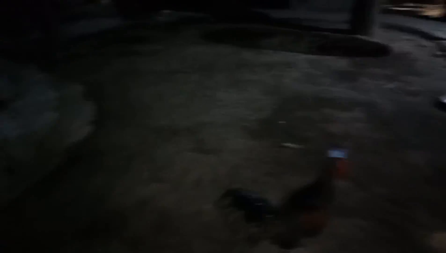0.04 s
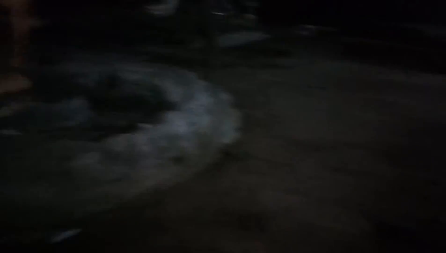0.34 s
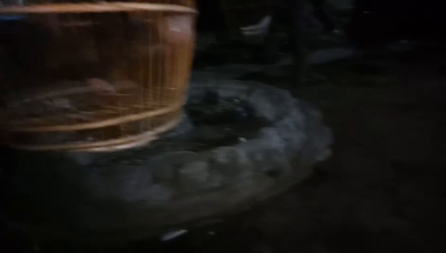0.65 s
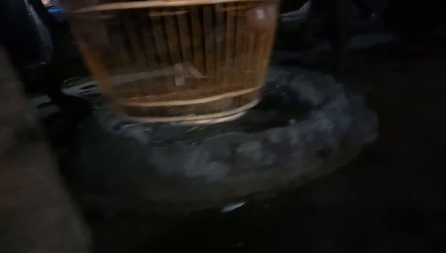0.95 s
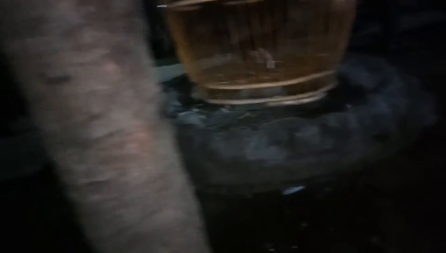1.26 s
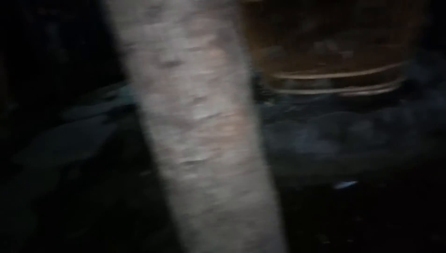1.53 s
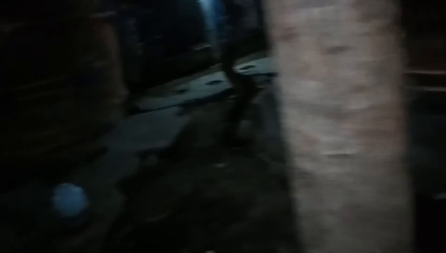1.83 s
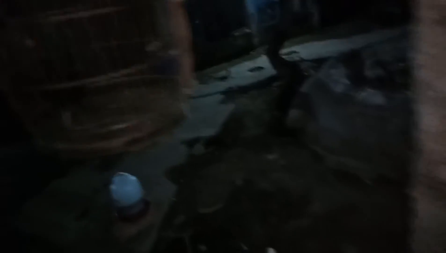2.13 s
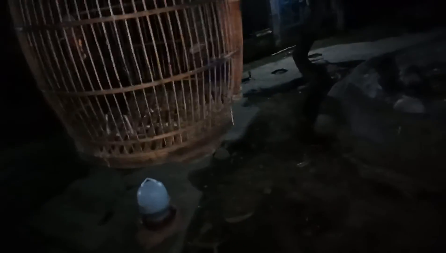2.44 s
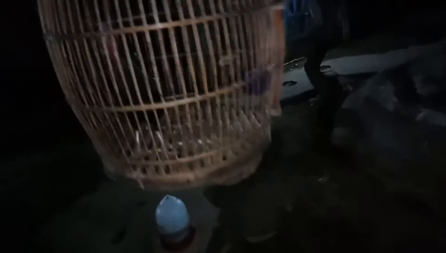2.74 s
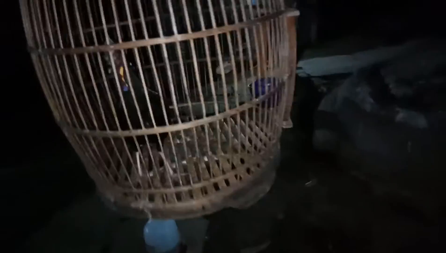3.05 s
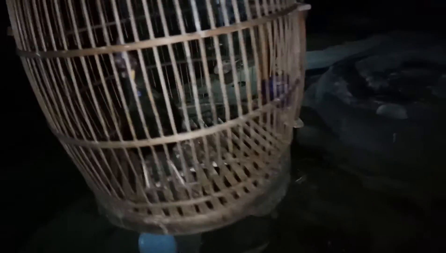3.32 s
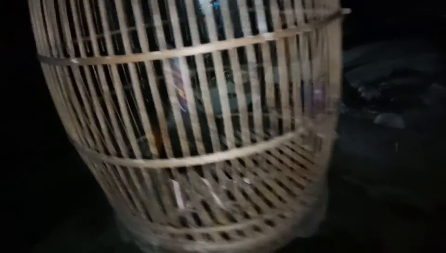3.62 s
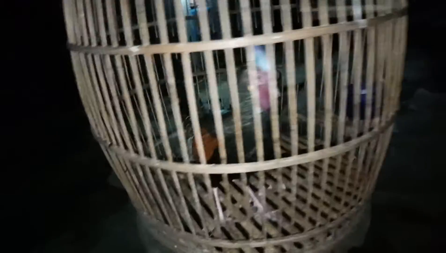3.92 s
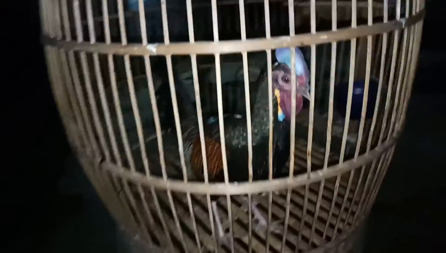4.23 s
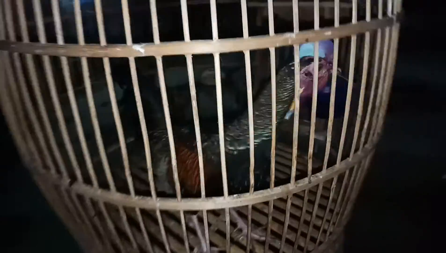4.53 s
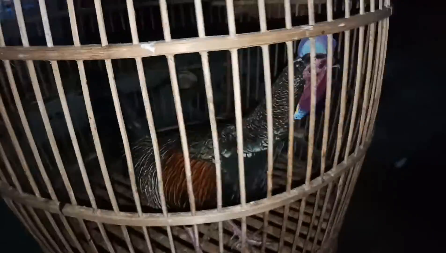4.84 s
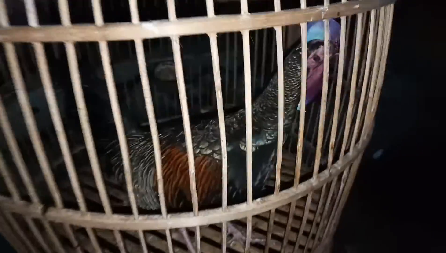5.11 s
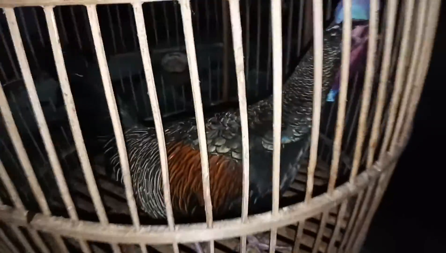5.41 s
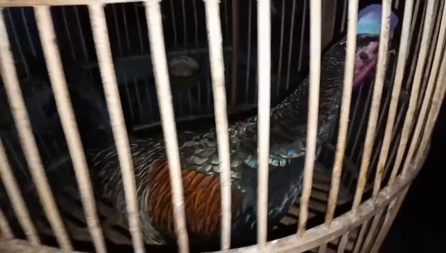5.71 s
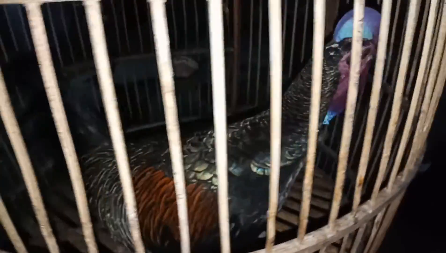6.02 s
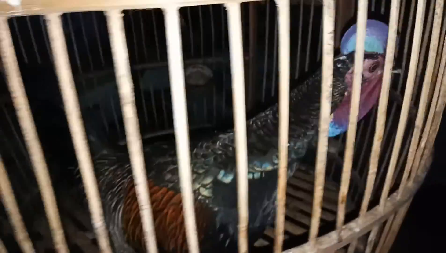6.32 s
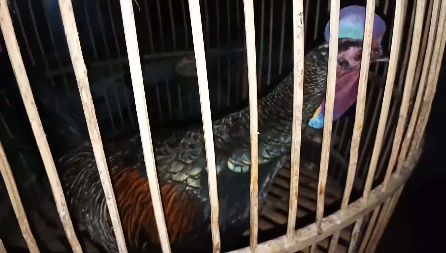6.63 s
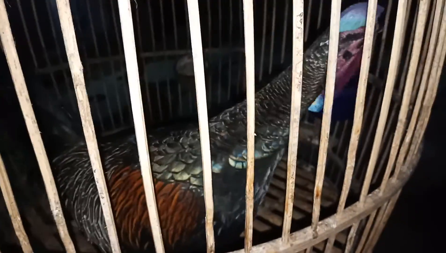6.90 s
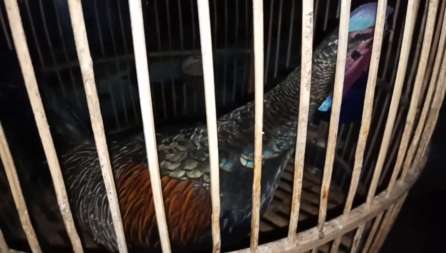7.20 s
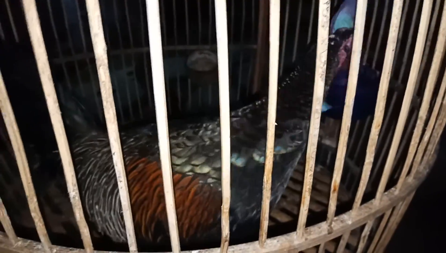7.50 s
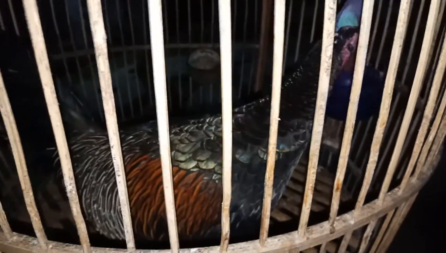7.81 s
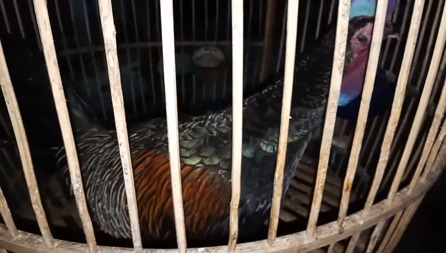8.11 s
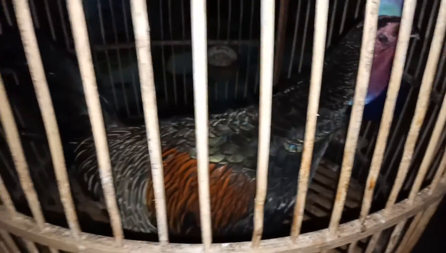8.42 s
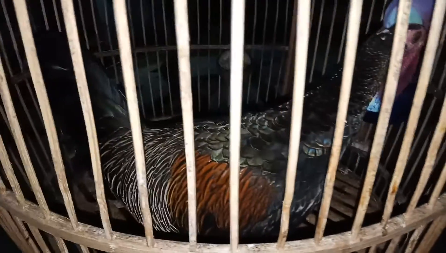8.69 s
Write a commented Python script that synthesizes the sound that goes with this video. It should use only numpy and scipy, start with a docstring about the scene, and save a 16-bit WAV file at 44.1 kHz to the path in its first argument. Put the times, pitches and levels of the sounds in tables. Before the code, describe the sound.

Over a faint, low night hush, several caged junglefowl keep up a rapid, agitated chatter close by. Sharp clucks mix with high squeals and quiet grunts, joined by deep, cracking clucks and softer replies from farther off. Each note rings briefly off the yard walls. A tiny far trill passes once, then the clucks sound closer and less echoing for a moment before the echo comes back.

```python
"""Junglefowl call in alarm from bamboo cages in a walled yard at night, over a low hush.
From the start, short arched clucks overlap with thin squeals and soft grunts: membranes buzz in each
bird's voice box, throat and beak shape the buzz, and the yard rings after every note. At 2 s deep,
cracking "koks" join in, and from 3 s a farther bird answers. Just after 5 s comes one faint, far trill.
Around 6 s the listener is closest to one cage and its clucks echo less; by 8 s their echo is back."""
import sys
import numpy as np
from scipy import signal
from scipy.fft import rfft, irfft, next_fast_len
from scipy.io import wavfile
from scipy.ndimage import uniform_filter1d, minimum_filter1d

SR = 44100
rng = np.random.default_rng(int(sys.argv[2]) if len(sys.argv) > 2 else 0)


def log_audio(samples):
    """Write samples as a 16-bit WAV file to the path given in sys.argv[1]."""
    # one column per channel
    frames = np.atleast_2d(samples).T
    # limit to full scale, then quantise
    limited = np.clip(frames, -1, 1)
    pcm = np.round(limited * 32767).astype(np.int16)
    wavfile.write(sys.argv[1], SR, pcm)


N = 385875
HIGHEST_HZ = 15650
LEAD, TRAIL = .3, .16  # closed-beak murmur before and after a note, as shares of its length


def from_db(db):
    """Turns decibels into a factor to multiply by."""
    return 10 ** (np.asarray(db) / 20)


def evened(x):
    """Scales a signal to an average strength (rms) of 1."""
    return x / np.sqrt(np.mean(x ** 2) + 1e-20)


def along(points, at):
    """Joins (place, value) points with straight lines."""
    return np.interp(at, *np.transpose(points))


def along_hz(points, hz):
    """Joins (frequency, value) points, giving each octave equal room."""
    f, value = np.transpose(points)
    return np.interp(np.log(hz + 1), np.log(f + 1), value)


def filtered(x, gain):
    """Multiplies each frequency f in x by gain(f)."""
    size = next_fast_len(len(x) + 2048)
    return irfft(rfft(x, size) * gain(np.fft.rfftfreq(size, 1 / SR)), size)[:len(x)]


def wobble(count, hz):
    """A smooth random wiggle, mostly slower than hz."""
    return evened(filtered(rng.standard_normal(count), lambda f: 1 / (1 + (f / hz) ** 4)))


def swell(progress, rise, fall):
    """Fades in and out over the given shares of a note."""
    fade_in = np.sin(np.pi / 2 * np.clip(progress / rise, 0, 1))
    fade_out = np.sin(np.pi / 2 * np.clip((1 - progress) / fall, 0, 1))
    return (fade_in * fade_out) ** 2


def add(mix, start_s, sound):
    """Mixes a sound in; it may have begun before time zero."""
    at = round(start_s * SR)
    sound = sound[:, max(-at, 0):]
    part = mix[:, max(at, 0):][:, :sound.shape[1]]
    part += sound[:, :part.shape[1]]


# The tone of the night air: (frequency [Hz], level [dB])
HUSH_TONE = [(25, -14), (45, -15), (80, -6.5), (120, 0.5), (200, -2), (330, -5.5), (500, -14), (1000, -31),
             (3100, -9), (5500, -31.5), (15000, -37)]
def hush():
    """The low, steady noise of the night, a little quieter at first."""
    level_db = np.interp(np.arange(N) / SR, [0, 1.3], [-66, -60])
    noise = filtered(rng.standard_normal(N), lambda f: from_db(along_hz(HUSH_TONE, f)))
    return from_db(level_db) * evened(noise)


def far_trill(peeps=5, per_s=31, hz=3300, droop=.17, db=-58):
    """A small, distant night caller: a quick run of falling peeps."""
    progress = (np.arange(int(peeps / per_s * SR)) * per_s / SR) % 1
    tone = np.sin(2 * np.pi * np.cumsum(hz * (1 - droop * progress ** 2)) / SR)
    return (from_db(db) * tone * swell(progress, .37, .37))[None]


# How long the yard rings: (frequency [Hz], time to fade by 60 dB [s])
YARD_RING = [(300, 0.92), (1300, 0.3558), (3000, 0.2737), (5000, 0.31), (8000, 0.25), (14000, 0.6)]
# The tone of its echo: (frequency [Hz], level [dB])
YARD_TONE = [(300, -10.5), (1300, -0.5), (4000, 6), (8000, 3), (14000, -4)]
def yard(x, bounces_per_s=3000, first_s=.006, build_s=.011):
    """Sound bounces off cages, ground and walls and blurs into a fading echo."""
    bounces = rng.standard_normal(SR) * (rng.random(SR) < bounces_per_s / SR)
    hz, t, spectrum = signal.stft(bounces, SR, nperseg=256)
    fade_db = -60 * t / along_hz(YARD_RING, hz)[:, None]
    spectrum = spectrum * from_db(along_hz(YARD_TONE, hz)[:, None] + fade_db)
    tail = signal.istft(spectrum, SR, nperseg=256)[1]
    tail *= np.clip((np.arange(len(tail)) / SR - first_s) / build_s, 0, 1)
    return evened(signal.fftconvolve(x, tail)[:N]) * np.std(x)


def approach(x, far_db=-6.5, near_db=-1):
    """The highest treble beams from the beak, so it grows as the listener nears the cage."""
    treble = filtered(x, lambda f: 1 - 1 / (1 + (f / 10000) ** 12))
    treble_db = np.interp(np.arange(N) / SR, [3, 6.2], [far_db, near_db])
    return x + treble * (from_db(treble_db) - 1)


def place(birds, start_s, length, note, db, echo_db):
    """Shares a note between the straight path to the ear (row 0) and the yard's echo (row 1)."""
    echo = from_db(echo_db)
    paths = np.outer([1, echo], note) / np.hypot(1, echo)
    add(birds, start_s - LEAD * length, from_db(db) * paths)


def note_progress(length):
    """Time through a note: 0 where the beak opens, 1 where it shuts."""
    return np.linspace(-LEAD, 1 + TRAIL, int((1 + LEAD + TRAIL) * length * SR))


def arch(pitches_hz, progress):
    """A pitch curve through a start, middle and end pitch, scooping up from below."""
    curve = np.polyfit([0, .5, 1], pitches_hz, 2)
    return np.maximum(np.polyval(curve, progress), .6 * pitches_hz[1])


def pulse_train(cycles, hz, smear=.55):
    """One pulse a cycle, smeared by the windpipe, with slightly uneven overtones."""
    harmonic = np.arange(1, int(HIGHEST_HZ / hz.max()) + 1)[:, None]
    strength = from_db(2.2 * rng.standard_normal(harmonic.shape))
    lag = smear * harmonic ** 2 + .4 * rng.standard_normal(harmonic.shape)
    return evened((strength * np.cos(2 * np.pi * harmonic * cycles - lag)).sum(0))


def voice_box(hz, rough, jitter, breath, rasp=0):
    """Membranes buzz in pulses; roughness makes them uneven and adds a puff of air to each."""
    rough = np.clip(rough, 0, .6)
    cycles = np.cumsum(hz * (1 + jitter * rough * wobble(len(hz), hz=228))) / SR
    pulses = pulse_train(cycles, hz)
    if rasp:  # an extra pulse every third cycle
        pulses += rasp * rough * pulse_train(cycles / 3, hz / 3)
    pulses *= 1 + .7 * rough * wobble(len(hz), hz=300)
    puffs = evened((.8 + np.exp(-(cycles % 1) / .4)) * rng.standard_normal(len(hz)))
    puffs = filtered(puffs, lambda f: f / (f + 900) * np.sqrt(1 + (f / 6500) ** 4))
    return pulses + breath * rough * puffs


def gullet(buzz, progress, strength, width_hz=330):
    """The gullet swells during a note, so the pitch it rings at slides down."""
    ring_hz = np.interp(progress, [0, .33, .62, 1], [2560, 1600, 1270, 1280])
    spin = np.exp(2j * np.pi * np.cumsum(ring_hz) / SR)
    decay = np.exp(-np.pi * width_hz / SR)
    ring = (spin * signal.lfilter([1 - decay], [1, -decay], buzz / spin)).real
    return buzz + strength * 2 * ring


def murmur(progress):
    """How much chest sound passes the closed beak: a little before a note, most as it ends."""
    fade = swell((progress + LEAD) / (1 + LEAD + TRAIL), .12, .17)
    return fade * np.interp(progress, [.55, .9], [.45, 1])


def bump(progress, peak, sharpness, leak_db=-27):
    """One rise and fall in loudness, highest at peak; a little leaks through the closed beak."""
    opening = np.sin(np.pi * np.interp(progress, [0, peak, 1], [0, .5, 1])).clip(0) ** sharpness
    return uniform_filter1d(opening, size=90) + from_db(leak_db) * murmur(progress)


# How windpipe and mouth colour the buzz: (frequency [Hz], level [dB])
AIRWAY_TONE = [(250, -35), (450, -21.5), (850, -18), (1080, -1.5), (1300, 4), (1650, 8.5), (2400, 12),
               (3000, -0.5), (3420, 2.5), (3750, -4.5), (4300, -5), (7000, -35.5), (9500, -54.5),
               (15500, -52.5)]
def airway(buzz, zones_db, swells):
    """Shapes the buzz in five zones, low to high: chest, throat, mouth, beak, air. Each has its swell."""
    voice = filtered(buzz, lambda f: from_db(along_hz(AIRWAY_TONE, f)))
    edges_hz = [240, 1000, 1650, 2950, 6500, 20000]
    chest_db, throat_db, beak_db, air_db = zones_db  # compared with the mouth zone
    levels_db = [chest_db, throat_db, 0, beak_db, air_db]
    note = 0
    for low, high, db, opening in zip(edges_hz, edges_hz[1:], levels_db, swells):
        zone = filtered(voice, lambda f: 1 / (1 + (f / high) ** 24) - 1 / (1 + (f / low) ** 24))
        note = note + from_db(db) * evened(zone * opening)
    return evened(note)


def soft_note(length, pitches_hz, rough, zones_db):
    """A breathy arch of the voice that is strongest early."""
    progress = note_progress(length)
    buzz = voice_box(arch(pitches_hz, progress), rough, jitter=.08, breath=.9)
    swells = [murmur(progress), bump(progress, .55, .8), bump(progress, .36, .65),
              bump(progress, .35, .9), bump(progress, .35, 1.3)]
    return airway(buzz, zones_db, swells)


# Clucks from a farther cage: (time [s], length [s], level [dB])
FAR_CLUCKS = [(3.22, 0.067, -29), (3.882, .075, -32), (4.337, 0.075, -25), (5.887, .07, -32),
              (6.408, .065, -29.5), (7.588, .07, -20), (8.221, .045, -21)]
def answers(birds):
    """Another bird clucks back from farther off."""
    for start_s, length, db in FAR_CLUCKS:
        note = soft_note(length, pitches_hz=(566, 639.6, 570), rough=.52, zones_db=(-17, 1.5, -3, -33))
        place(birds, start_s, length, note, db, echo_db=-2.5)


# How far a grunt opens the beak: (length [s], boost above the chest zone [dB])
GRUNT_BRIGHTNESS = [(.018, -2), (.045, 5.5)]
# Grunts between the louder notes: (time [s], length [s], level [dB])
GRUNT_NOTES = [(0.117, 0.021, -31), (0.558, .025, -27.5), (0.784, .019, -37.5), (1.216, .023, -24.5),
               (1.774, .025, -49), (1.801, .027, -32.5), (2.032, .042, -26.5), (2.285, .023, -34.5),
               (2.479, .016, -27.5), (2.783, 0.017, -45), (3.039, .025, -29.5), (3.396, .033, -36.5),
               (3.572, 0.02, -40), (4.116, 0.023, -30), (4.53, .02, -45), (4.746, .014, -27),
               (4.913, .022, -23.5), (5.426, .07, -31), (5.535, .026, -28.5), (6.09, .034, -29),
               (6.583, .049, -24), (7.009, 0.038, -24.5), (8.029, .05, -26), (8.532, .02, -30)]
def grunts(birds):
    """Soft, low catches of the voice; longer ones have time to open the beak and sound brighter."""
    for start_s, length, db in GRUNT_NOTES:
        zones_db = (-12, -2.5, -12, -46) + along(GRUNT_BRIGHTNESS, length) * np.array([0, 1, 1, 1])
        note = soft_note(length, pitches_hz=(392, 435.2, 374), rough=.39, zones_db=zones_db)
        place(birds, start_s, length, note, db, echo_db=-2.5)


def squeal_pitch(progress, length, top_hz, fall_hz, whine_s=.018, leap_s=.007, hold_share=.6):
    """A rising whine leaps to its top pitch, holds it and falls (or lifts, if fall_hz is negative)."""
    steps_hz = [1161, min(1324.6, top_hz), top_hz]
    rise = np.interp(progress * length, [0, whine_s, whine_s + leap_s], steps_hz)
    return rise - fall_hz * np.maximum((progress - hold_share) / (1 - hold_share), 0)


# Hoarseness through a squeal: (progress [share of note], roughness [factor])
SQUEAL_ROUGHNESS = [(.1, 1.3), (.45, 0.65), (.85, 2.33)]
# Squeals, plus two thin ringing tones that linger after the clucks at 6.14 s and 7.73 s:
# (time [s], length [s], level [dB], top pitch [Hz], final fall [Hz])
SQUEALS_AND_RINGS = [(-.03, .055, -25.5, 1488, 29.5), (0.519, 0.061, -31, 1324, 1),
                     (.604, .064, -14, 1469, 200.5), (0.834, .054, -14.5, 1385, 231),
                     (1.173, 0.044, -30.5, 1299, 22.5), (1.266, .052, -13.5, 1530, 82),
                     (1.817, .055, -28, 1261, -91), (1.853, .054, -13, 1511, 3.5),
                     (3.035, 0.077, -30.5, 1317, 59), (3.084, .066, -14, 1508, 81),
                     (3.72, .067, -23.5, 1510, 18), (4.283, .075, -18.5, 1487, -61.5),
                     (4.992, 0.062, -19.5, 1478, 1), (5.483, 0.056, -28, 1296, 38),
                     (5.595, .062, -17, 1476, 49.5), (6.178, 0.045, -17.5, 1462, 22.5),
                     (6.689, .07, -25.5, 1297, -1), (6.743, .058, -16, 1469, 20),
                     (7.284, .07, -18, 1297, 62), (7.404, .072, -15, 1474, 31),
                     (7.767, .062, -18.5, 1361, 41), (8.182, .068, -17, 1476, -1),
                     (8.338, .055, -17, 1306, 70.5)]
def squeals_and_rings(birds, middling_db=-19):
    """Thin, rasping notes an octave above the clucks; harder squeals open the throat and echo less."""
    for start_s, length, db, top_hz, fall_hz in SQUEALS_AND_RINGS:
        progress = note_progress(length)
        rough = .33 * along(SQUEAL_ROUGHNESS, progress)
        hz = squeal_pitch(progress, length, top_hz, fall_hz)
        buzz = voice_box(hz, rough, jitter=.039, breath=1, rasp=.56)
        buzz = gullet(buzz, progress, strength=1.2 * rough)
        buzz *= 1 + .25 * wobble(len(progress), hz=70)  # the level flutters
        buzz *= from_db(.05 * (hz - top_hz))  # weaker below the top pitch
        swells = [murmur(progress), bump(progress, .49, .6), bump(progress, .27, .47),
                  bump(progress, .44, 3.3), bump(progress, .44, 1.1)]
        effort_db = db - middling_db
        zones_db = (-20.5, .5, -6, -33) + effort_db * np.array([.42, 1, .55, .52])
        place(birds, start_s, length, airway(buzz, zones_db, swells), db, echo_db=-1.5 - .2 * effort_db)


def loud_note(hz, progress, rough, zones_db, mouth_peak, throat_peak, throat_sharpness):
    """The mouth zone sounds first, the beak opens mid-note, and the note sinks into the throat."""
    buzz = voice_box(hz, rough, jitter=.055, breath=1.3)
    buzz = gullet(buzz, progress, strength=1.5 * rough.mean())  # harsh notes swell it most
    buzz *= 1 + .18 * wobble(len(progress), hz=90)
    beak_peak = (mouth_peak + .66) / 2
    swells = [murmur(progress), bump(progress, throat_peak, throat_sharpness),
              bump(progress, mouth_peak, .52), bump(progress, beak_peak, 2.1),
              bump(progress, beak_peak, 2.3)]
    return airway(buzz, zones_db, swells)


# The listener's walk up to the cage: (time [s], nearness [dB])
CAGE_NEARNESS = [(0, 1.5), (4.3, 0.5), (5.8, 6), (7.3, 5), (8.2, 0.5)]
def nearness_db(time_s):
    """How near the calling bird is: close up, koks have more chest and clucks less echo."""
    return along(CAGE_NEARNESS, time_s)


# Hoarseness around a kok's crack: (progress since the crack [share of note], roughness [factor])
KOK_ROUGHNESS = [(-.05, 1.68), (.2, .65)]
# The koks: (time [s], length [s], level [dB], roughness [0-1], crack [share of note], throat [dB])
KOK_NOTES = [(2.063, .06, -16, 0.8, 0.27, 1), (2.84, .052, -16, .5, .3, 3.5),
             (3.684, .058, -13.5, .45, .45, 6), (4.585, 0.054, -15, 0.6, .2, 1),
             (5.652, .063, -13, 0.4, .62, 4), (6.312, 0.052, -13.5, 0.1, .68, 3),
             (6.903, 0.047, -12, 0.3, 0.32, 5.5), (7.512, 0.053, -11.5, .34, .3, 7),
             (8.1, .053, -13.5, .42, 0.42, 6)]
def koks(birds, pitches_hz=(405.3, 478.1, 419), jump_ratio=1.41, jump_share=.041):
    """Deep, hoarse clucks: the voice cracks up to the usual pitch and ends cleaner, in the throat."""
    for start_s, length, db, rough, crack, throat_db in KOK_NOTES:
        progress = note_progress(length)
        jump = np.interp(progress - crack, [-jump_share / 2, jump_share / 2], [1, jump_ratio])
        hz = arch(pitches_hz, progress) * jump
        zones_db = [-16 + nearness_db(start_s), throat_db, -3, -30.5]
        note = loud_note(hz, progress, rough * along(KOK_ROUGHNESS, progress - crack), zones_db,
                         mouth_peak=.51, throat_peak=.79, throat_sharpness=1.8)
        place(birds, start_s, length, note, db, echo_db=-9)


# Hoarseness through a cluck: (progress [share of note], roughness [factor])
CLUCK_ROUGHNESS = [(.1, 1.7), (.45, 0.78), (.75, 1.22), (1, 2)]
# The nearest birds' clucks: (time [s], length [s], level [dB], roughness [0-1], throat [dB], beak [dB])
CLUCK_NOTES = [(.042, 0.061, -19, .42, -6, -5), (0.169, 0.058, -16.5, 0.39, -1, -2),
               (0.366, 0.092, -23, 0.41, -1, -3.5), (.908, .058, -18.5, .27, -5, -3),
               (1.357, 0.067, -14, 1, -5.5, -8), (1.889, 0.074, -17.5, 0.55, -2, -4),
               (2.332, 0.061, -18, 0.19, 4.5, -2.5), (2.518, .07, -15.5, .75, -6, -7),
               (2.892, 0.047, -16.5, 0.28, 0.5, -5.5), (3.436, .066, -19.5, 0.3, -1.5, -5),
               (3.628, 0.063, -19.5, 0.12, -3, -4.5), (4.161, .064, -16.5, 0.27, -3, -3.5),
               (4.785, .062, -15, 0.27, -6, -5.5), (4.962, 0.063, -15, 0.4, -2.5, -1),
               (5.732, .062, -16.5, 0.3, -4, -4), (6.139, 0.067, -16.5, 0.2, -6, 0),
               (6.82, .054, -12.5, 0.32, -11.5, -3.5), (7.034, 0.07, -19.5, 0.32, -1, -0.5),
               (7.728, 0.061, -14, 0.3, -5.5, -2), (7.925, 0.061, -14.5, 0.23, -2.5, -1.5),
               (8.376, .05, -13.5, 0.8, -4.5, -2.5), (8.576, .056, -14, 0.31, -3, -4.5)]
def clucks(birds, pitches_hz=(551.7, 683.8, 578.3)):
    """Each cluck arches to about the same top pitch and is cleanest there; its ends vary a little."""
    for start_s, length, db, rough, throat_db, beak_db in CLUCK_NOTES:
        progress = note_progress(length)
        variation = 1 + .0406 * rng.standard_normal(3) * [1, .2, 1]
        hz = arch(pitches_hz * variation, progress)
        zones_db = [-21, throat_db, beak_db, beak_db - 30]
        note = loud_note(hz, progress, rough * along(CLUCK_ROUGHNESS, progress), zones_db,
                         mouth_peak=.33, throat_peak=.84, throat_sharpness=.93)
        place(birds, start_s, length, note, db, echo_db=-4 - nearness_db(start_s))


def scene():
    """The birds and the yard's echo of them, over the hush and the far trill."""
    birds = np.zeros((2, N))
    for calls in clucks, koks, squeals_and_rings, grunts, answers:
        calls(birds)
    direct, into_yard = birds
    mix = (approach(direct + yard(into_yard)) + hush())[None]
    add(mix, start_s=5.25, sound=far_trill())
    return mix


def record(dry, ceiling=.89):
    """A fast limiter turns down any peak above the ceiling; then the very highest treble is cut."""
    gain = np.minimum(1, ceiling / (abs(dry[0]) + 1e-9))
    gain = minimum_filter1d(gain, size=400)
    gain = uniform_filter1d(uniform_filter1d(gain, size=200), size=200)
    treble_cut = signal.firwin(511, HIGHEST_HZ, window=("kaiser", 9), fs=SR)
    return signal.oaconvolve(dry * gain, treble_cut[None], "same")


dry = scene()
out = record(dry)
log_audio(out)
```